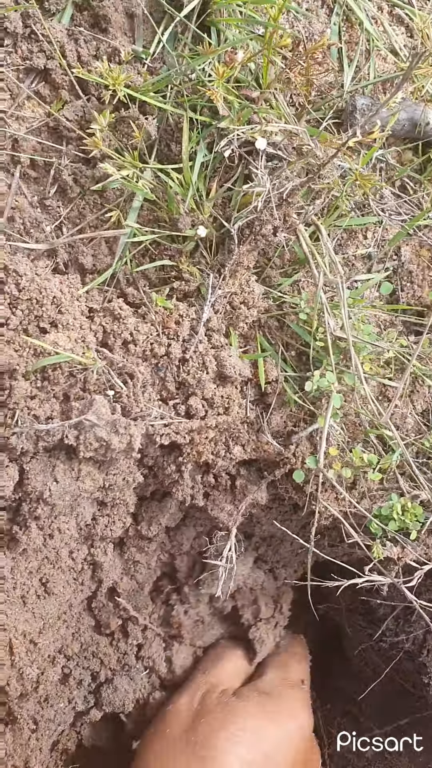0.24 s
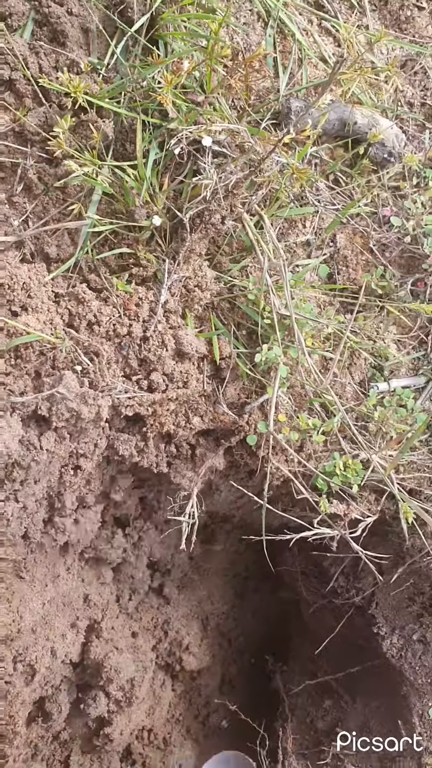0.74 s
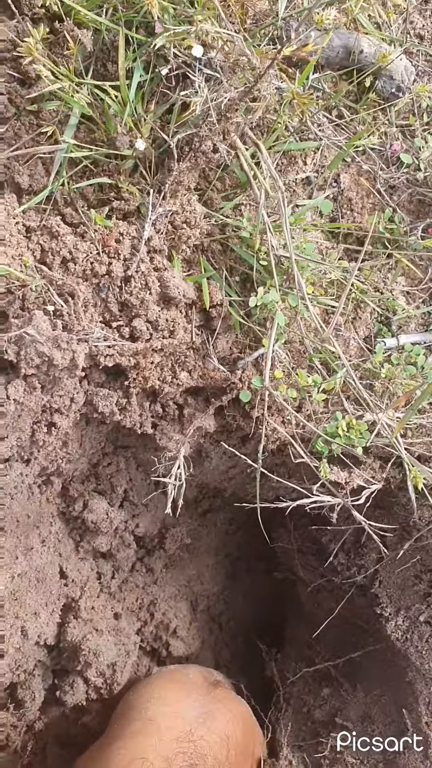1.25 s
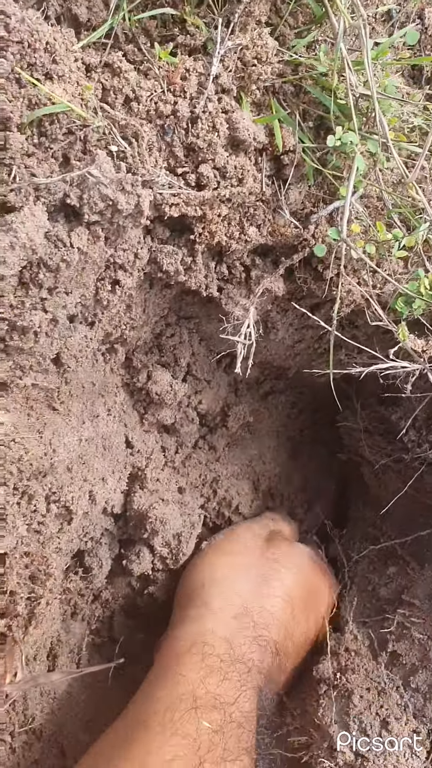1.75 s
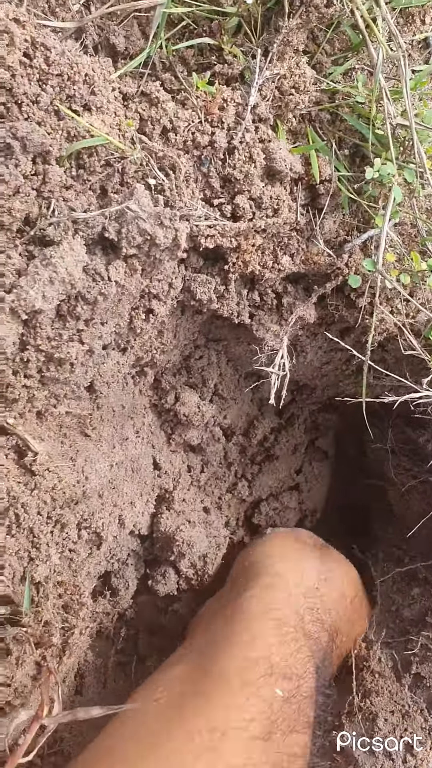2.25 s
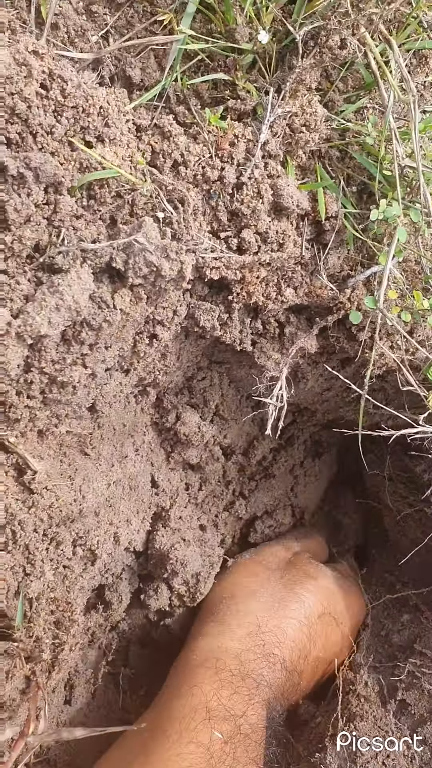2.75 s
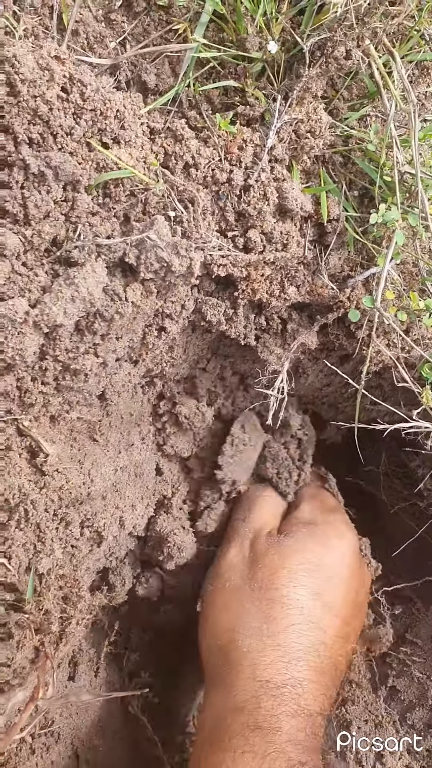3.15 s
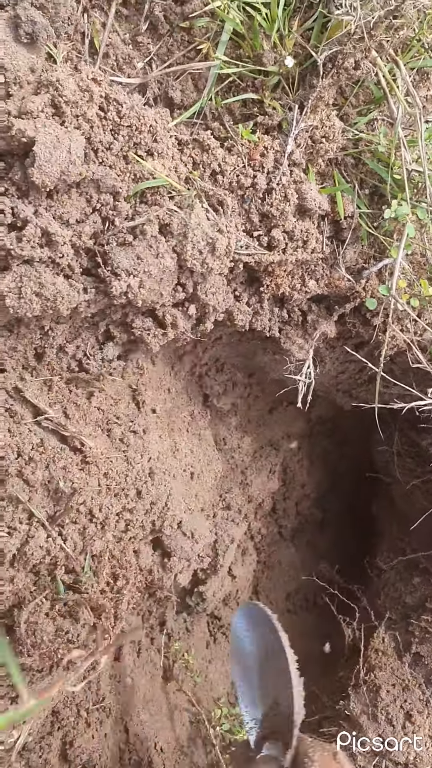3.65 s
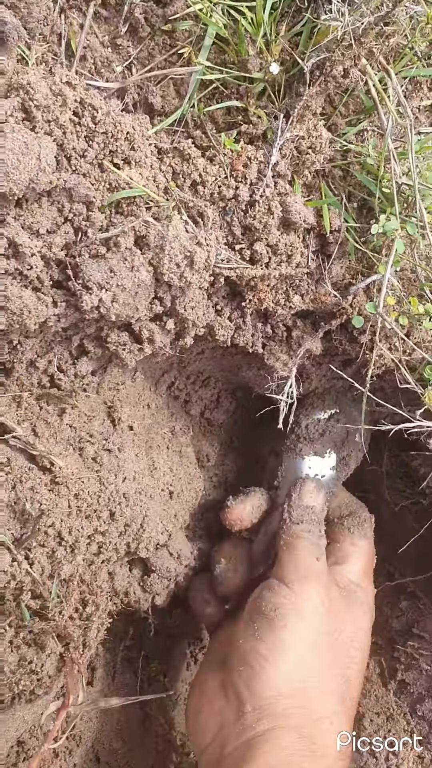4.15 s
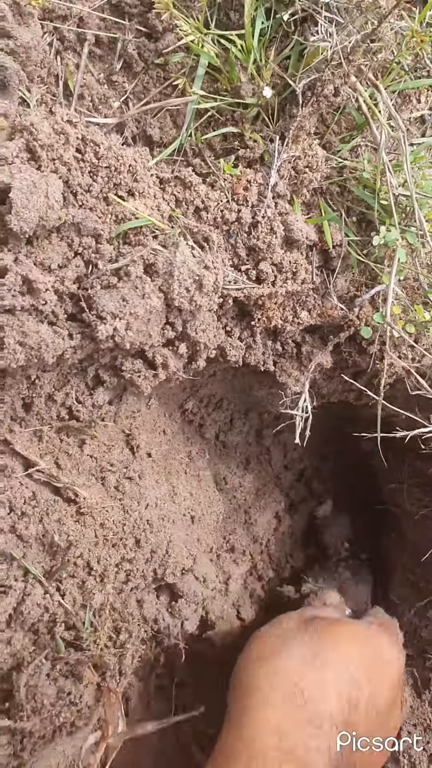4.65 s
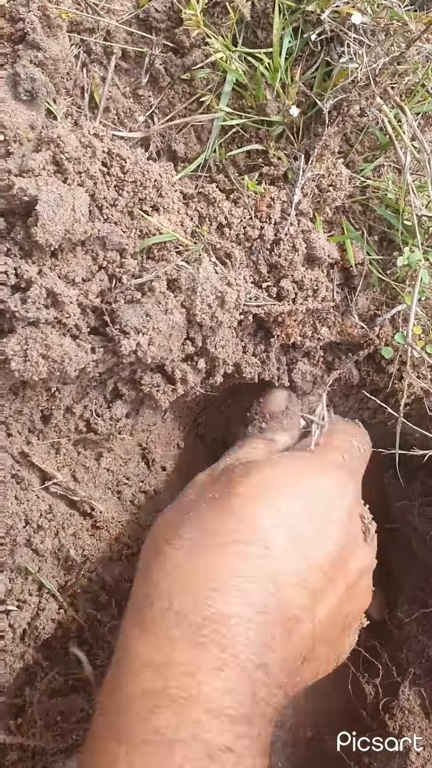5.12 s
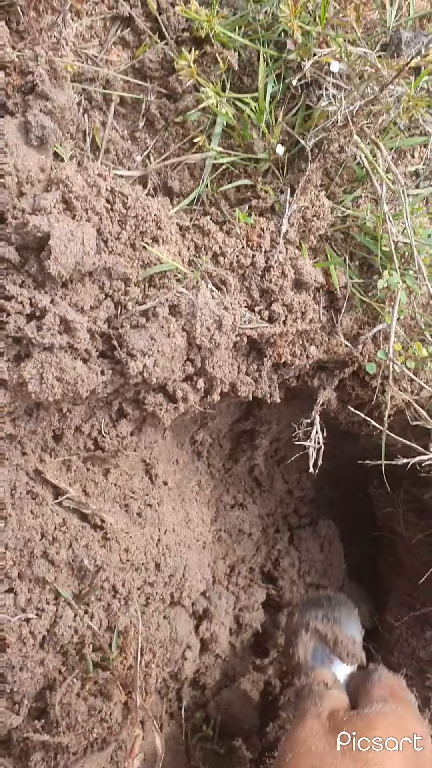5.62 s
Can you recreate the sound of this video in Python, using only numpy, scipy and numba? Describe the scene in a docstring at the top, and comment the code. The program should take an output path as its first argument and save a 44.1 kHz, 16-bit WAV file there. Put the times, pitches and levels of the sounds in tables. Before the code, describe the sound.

Fingers rake loose soil in a small hole, in short gritty strokes with brief pauses. A thin spoon scrape comes after about a second, then a busier run of hand digging. Near the end a spoon digs and scoops with two louder, rasping scrapes. Lumps crack, crumbs trickle and the hand thuds softly on the ground. It is close and outdoors, with soft air rumble on the microphone.

```python
"""Digging loose soil by hand and spoon

Close to a phone outdoors, each stroke in a small hole crushes thousands of grains in small slips,
coloured by the hollow between hand and hole. Lumps crack, crumbs spill in the pauses and the hand
thuds on the ground. Air rumbles softly on the microphones over a faint hiss."""
import sys
import numpy as np
from scipy import signal
from scipy.fft import rfft, irfft, next_fast_len
from scipy.io import wavfile
from scipy.ndimage import uniform_filter1d, map_coordinates
from numba import njit

SR = 44100
rng = np.random.default_rng(int(sys.argv[2]) if len(sys.argv) > 2 else 0)


def transcribe(signal):
    """Save signal, clipped to [-1, 1], as a 16-bit WAV file at the path in sys.argv[1]."""
    frames = np.atleast_2d(signal).T
    limited = np.clip(frames, -1, 1)
    pcm = np.round(limited * 32767).astype(np.int16)
    wavfile.write(sys.argv[1], SR, pcm)


N = 259308
T = np.arange(N) / SR

# finger sweeps: (start [s], press [s], bite [s], drag [s], level [dB], clods [rel. dB], sand [rel. dB])
HAND_STROKES = [(-0.03, 0.1, 0.006, 0.0033, -38, -1.5, 0), (0.102, 0.0093, 0.019, 0.004, -39, -6, -1.5),
                (0.185, 0.056, 0.22, 0.028, -48.5, -10.5, -2), (0.448, 0.039, 0.042, 0.002, -49, -3.5, 0),
                (0.54, 0.028, 0.27, .09, -75, -5, 7), (1.547, 0.07, 0.024, 0.0041, -45, -6, -0.5),
                (1.767, 0.074, 0.011, 0.025, -37.5, -7, -2.5),
                (2.154, 0.13, 0.029, .005, -38.5, -12.5, 4.5),
                (2.256, 0.069, 0.0022, 0.17, -34.5, -9.5, -3), (2.53, 0.045, 0.066, 0.026, -44, -5, -4.5),
                (2.614, 0.012, 0.026, 0.011, -39, -3, -3.5), (2.675, 0.12, 0.11, 0.12, -40.5, -4, -7),
                (2.912, 0.018, 0.045, 0.16, -40, -10.5, -3), (3.12, 0.076, 0.14, 0.081, -40, -13, -2),
                (3.335, 0.033, 0.02, 0.002, -42, -7.5, -18), (4.018, 0.025, 0.036, 0.015, -53, 2, 5.5),
                (5.445, 0.06, 0.014, 0.0011, -43.5, -9.5, 1.5)]
# spoon push, dig and scoop: columns as HAND_STROKES
SPOON_STROKES = [(1.063, 0.16, 0.13, 0.13, -38.5, -14, 1.5), (4.15, .17, 0.17, 0.085, -32, -7.5, -5),
                 (4.972, 0.027, 0.11, 0.22, -31.5, -9, -5.5)]
# hollow around the fingers, then in each spoon stroke: (frequency [Hz], gain [dB])
HAND_TONE = [(280, -8.5), (747, -10.5), (997, -4), (1320, -2.5), (1570, 4.5), (1820, -1), (2100, 2.5),
             (2710, -3.5), (4130, -6.5), (7500, -25.5), (10800, -17.5), (16000, -21.5)]
PUSH_TONE = [(290, -23), (1280, -21), (2400, -13), (3900, -17.5), (5000, -16), (6000, -20.5), (8700, -21.5),
             (11800, -4.5), (16000, -19)]
DIG_TONE = [(280, 5), (760, -4.5), (1020, -3), (1330, -7.5), (1800, 2), (2250, -4.5), (2600, -1),
            (3050, -7), (3800, -3.5), (4650, -7.5), (7600, -19), (10100, -12.5), (16000, -19.5)]
SCOOP_TONE = [(280, 0.5), (465, -7.5), (1100, -12), (1550, -4.5), (2450, -5.5), (3360, -4.5), (3950, -7.5),
              (4500, -14.5), (5600, -14.5), (6300, -23), (8270, -27.5), (11600, -22.5), (16000, -27.5)]
# ringing edge gap: (start [s], end [s], level [dB], start pitch [Hz], end pitch [Hz], width [Hz])
RASPS = [(0.058, 0.082, -39.5, 5000, 4200, 2600), (0.71, 0.762, -60, 3460, 3580, 700),
         (1.071, 1.144, -45.5, 5340, 5100, 1300), (1.077, 1.192, -45, 2930, 2680, 900),
         (1.18, 1.394, -37, 2300, 2420, 786), (1.846, 1.88, -29, 1030, 1220, 696),
         (1.855, 1.876, -24, 1920, 2030, 1170), (2.274, 2.466, -32.5, 2340, 2280, 565),
         (2.55, 2.673, -47, 2090, 2040, 260), (2.29, 2.46, -42.5, 4550, 4930, 1200),
         (3.182, 3.297, -41.5, 400, 358, 272), (3.374, 3.439, -40, 1760, 2070, 1010),
         (4.439, 4.519, -33, 2200, 1840, 650), (4.535, 4.581, -32.5, 1970, 2400, 900),
         (5.044, 5.117, -30.5, 3500, 3100, 1480), (5.004, 5.302, -42, 3800, 3350, 1100),
         (5.501, 5.515, -32, 1770, 1750, 556)]
# lumps cracking: (time [s], level [dB], pitch [Hz], t60 [s])
CRACKS = [(0.014, -24.5, 580, 0.016), (0.0652, -17.5, 520, 0.032), (0.116, -33.5, 700, 0.065),
          (1.4499, -29, 1656, 0.11), (1.881, -12, 1790, 0.012), (2.642, -26, 1020, 0.13),
          (3.4319, -30.5, 1630, 0.0078), (4.294, -37, 2000, 0.0071), (4.5729, -14.5, 2000, 0.0074),
          (4.574, -15.5, 2500, 0.007), (4.604, -18.5, 1170, 0.028), (4.7, -36.5, 580, 0.056)]
# crumb spills: (time [s], level [dB], length [s])
SPILLS = [(0.715, -47.5, 0.062), (0.894, -52.5, 0.085), (1.698, -49, 0.38), (2.045, -37, 0.028),
          (2.101, -47, 0.045), (3.531, -43.5, 0.013), (3.643, -53, 0.028), (3.698, -47.5, 0.014),
          (3.54, -60.5, 1), (3.884, -56, 0.032), (4.954, -50, 0.043), (5.547, -39, 0.022),
          (5.62, -51, 0.095)]
# crumb spectrum: (frequency [Hz], gain [dB])
SPILL_TONE = [(760, -1), (1300, -5), (3790, 1.5), (9270, -0.5), (12300, 6.5), (16000, 2.5)]
# hand bumping the ground: (time [s], peak [dB], pitch [Hz])
THUDS = [(0.613, -31.5, 61.5), (0.755, -34, 128), (0.888, -28.5, 75.5), (1.689, -29.5, 76.5),
         (2.815, -25, 85), (2.875, -26, 86), (3.046, -34, 67.5), (4.035, -28, 92), (4.283, -24.5, 86)]
# air on the microphones: (time [s], level [dB])
RUMBLE_LEVEL = [(0, -39), (0.55, -46), (0.88, -40), (1.0, -47), (1.12, -43.5), (3.4, -45), (3.97, -46),
                (4.3, -43), (4.72, -46.5), (5.1, -41.5), (5.88, -43)]
# its spectrum: (frequency [Hz], gain [dB])
RUMBLE_TONE = [(15, -11), (30, -16.5), (50, -0.5), (85, -0.5), (130, -8), (220, -10), (400, -28.5),
               (800, -45.5)]
# outdoor hiss: (time [s], level [dB])
HISS_LEVEL = [(4.0, -61), (4.8, -64), (5.88, -60.5)]
# its spectrum: (frequency [Hz], gain [dB])
HISS_TONE = [(500, 2), (1000, -12), (2000, -1), (3100, -6), (4500, 1), (7600, -16), (11000, 3.5),
             (16000, -11)]
# soil at the two microphones: (frequency [Hz], side gain [dB], left minus right [dB])
MIC_RESPONSE = [(400, -11, 0), (1100, -5, 3.2), (2500, -4.5, 2.8), (5500, -2, .8), (12000, 0, -.4)]
# moving scrape point; the spoon's edge is one small source, spread fingers are many:
# (time [s], left lag [ms], side gain [dB])
SCRAPE_PATH = [(0.95, 0, 0), (1.07, 0.12, -8), (1.27, 0.12, -15), (1.42, 0.165, -11), (1.55, 0.03, -1),
               (2.12, 0.03, -4), (2.28, 0.18, -6), (2.45, 0.18, -7), (2.55, 0, 0), (4.2, 0.018, -1.5),
               (5.0, -0.012, -2.5)]


def digging():
    """Crumbly finger sweeps and three spoon scrapes; coarse grit ticks on the spoon."""
    hand = crunch(per_s=8000, spread_db=2.6, slip_db=1.5, clod_db=1.2, patchy_db=2.7)
    spoon = crunch(per_s=7500, spread_db=2.0, slip_db=1.6, clod_db=1.1, patchy_db=2.4)
    spoon += undb(-12) * grains(per_s=70, spread_db=1)
    edge = crunch(per_s=12000, spread_db=0.5, slip_db=1.6, clod_db=0.5, patchy_db=1.5)
    out = scrape(hand, HAND_TONE, HAND_STROKES) + rasps(edge)
    for stroke, tone in zip(SPOON_STROKES, (PUSH_TONE, DIG_TONE, SCOOP_TONE)):
        out += scrape(spoon, tone, [stroke])
    return out


def crunch(per_s, spread_db, slip_db, clod_db, patchy_db):
    """Grains break in quick slips and slower clod-sized ones; each soil patch favours its own pitches."""
    clicks = grains(per_s, spread_db) * undb(slip_db * stress(per_s=230) + clod_db * stress(per_s=45))
    spectra = signal.stft(clicks, nperseg=512)[2]
    patches = rng.standard_normal(spectra.shape[1:])
    for _ in range(2):
        patches = uniform_filter1d(patches, size=4, axis=0)
        patches = uniform_filter1d(patches, size=7, axis=1)
    spectra *= undb(patchy_db * unit(patches))
    return unit(signal.istft(spectra)[1][:, :N])


def grains(per_s, spread_db):
    """Random clicks, a few of them large; mid and side rows differ only in their signs."""
    size = undb(spread_db * np.minimum(rng.exponential(size=N), 5))
    hits = rng.random(N) < per_s / SR
    return unit(hits * size * rng.choice([-1, 1], (2, N)))


def stress(per_s):
    """Stress builds and lets go at random moments; rms near 1."""
    breaks = np.flatnonzero(rng.random(N) < per_s / SR)
    ramp = np.interp(np.arange(N), breaks, np.arange(len(breaks))) % 1
    return np.sqrt(12) * (ramp - .5)


def scrape(grit, tone, strokes, sand_fade_db_per_s=6):
    """Soil heard through the hollow: clods give the body, sand the top. Dry sand thins with depth."""
    power = np.zeros((3, N))
    for start_s, press_s, bite_s, drag_s, db, clod_db, sand_db in strokes:
        force = undb(db) * pressure(start_s, press_s, bite_s, drag_s)
        sand = undb(sand_db - sand_fade_db_per_s * np.maximum(T - start_s, 0))
        power += np.array([force * undb(clod_db), force, force * sand]) ** 2
    coloured = colour(grit, tone)
    bands_hz = (280, 900), (900, 6000), (6000, 16000)
    return sum(unit(band(coloured, *hz)) * gain for hz, gain in zip(bands_hz, np.sqrt(power)))


def pressure(start_s, press_s, bite_s, drag_s):
    """Stroke force, 0-1: touch, press in, bite until the soil gives way, drag, lift off."""
    touch_db, touch_s = -12, 0.03
    give_db, give_tau_s, lift_tau_s = -6, 0.0044, 0.048
    age_s = np.maximum(T - start_s, 0)
    loose_s = np.maximum(age_s - press_s - bite_s, 0)
    press = np.minimum(age_s / touch_s, 1) * undb(touch_db * np.maximum(1 - age_s / press_s, 0))
    give = undb(give_db * (1 - np.exp(-loose_s / give_tau_s)))
    lift = np.exp(-np.maximum(loose_s - drag_s, 0) / lift_tau_s)
    return press * give * lift


def rasps(grit):
    """Grains ring the gap at the scraping edge; the pitch glides as it opens or closes."""
    out = np.zeros((2, N))
    for start_s, end_s, db, start_hz, end_hz, width_hz in RASPS:
        hz = np.interp(T, (start_s, end_s), (start_hz, end_hz))
        ring = np.array([resonate(resonate(row, hz, width_hz), hz, width_hz) for row in grit])
        fade_s = (end_s - start_s) / 4
        gate = np.clip(np.minimum(T - start_s, end_s - T) / fade_s + .5, 0, 1)
        out += unit(ring) * undb(db) * gate
    return out


def cracks(snap_db=-17, crumble_db=-6.5, build_s=0.00134, decay_cycles=1.6):
    """A lump strains, then gives way: a dead pitched knock, a crumbling burst and a bright snap."""
    out = np.zeros((2, N))
    for time_s, db, hz, t60_s in CRACKS:
        near = np.abs(T - time_s) < .1
        age_s = T[near] - time_s - build_s
        burst = rng.standard_normal((2, len(age_s)))
        crack = undb(crumble_db) * unit(band(burst, hz / 2, hz * 1.53, order=2))
        crack += undb(snap_db) * unit(band(burst, 1600, 12000, order=1))
        cycles = hz * np.maximum(age_s, 0)
        crack[0] += np.sin(2 * np.pi * cycles) * np.exp(-cycles / decay_cycles)  # knock, mid only
        envelope = np.exp(np.minimum(age_s / build_s, -np.log(1000) * age_s / t60_s))
        out[:, near] += undb(db) * crack * envelope
    return out


def spills():
    """Crumbs run down the wall in small rushes that swell and settle."""
    flow = np.zeros(N)
    for time_s, db, length_s in SPILLS:
        flow += undb(db) * swell(time_s, rise_s=length_s / 4)
    return unit(colour(grains(per_s=5000, spread_db=2.5), SPILL_TONE)) * flow


def thuds():
    """Soft flesh on packed earth: a few slow swings."""
    out = np.zeros(N)
    for time_s, db, hz in THUDS:
        out += undb(db) * np.sin(2 * np.pi * hz * (T - time_s)) * swell(time_s, rise_s=0.0066)
    return out


def rumble(side_db=-6, flutter_db=2.5, upper_drift_db=1.0):
    """Air flutters on the microphone ports; the upper part swells and fades on its own."""
    flow = unit(colour(rng.standard_normal((2, N)), RUMBLE_TONE))
    upper = signal.sosfiltfilt(signal.butter(2, 190, "high", fs=SR, output="sos"), flow)
    mid, side = flow + upper * (undb(upper_drift_db * drift(per_s=10)) - 1)
    gust = undb(np.interp(T, *np.transpose(RUMBLE_LEVEL)) + flutter_db * drift(per_s=14))
    return gust * (mid + undb(side_db) * side * np.array([[1], [-1]]))


def hiss():
    """Faint outdoor hiss; dips briefly near the end."""
    gain = undb(np.interp(T, *np.transpose(HISS_LEVEL)))
    return unit(colour(rng.standard_normal((2, N)), HISS_TONE)) * gain


def microphones(soil):
    """Mid/side to left/right: wider in the treble; the left lags as the scrape moves right."""
    hz, side_db, pan_db = np.transpose(MIC_RESPONSE)
    times_s, lag_ms, path_side_db = np.transpose(SCRAPE_PATH)
    mid, side = soil
    side = colour(side, zip(hz, side_db)) * undb(np.interp(T, times_s, path_side_db))
    lag_s = np.interp(T, times_s, lag_ms) / 1000
    left = map_coordinates(mid + side, [(T - lag_s) * SR], order=5, mode="mirror")
    return np.array([colour(left, zip(hz, pan_db / 2)), colour(mid - side, zip(hz, -pan_db / 2))])


def undb(db):
    """Decibels to gain."""
    return 10 ** (np.asarray(db) / 20)


def unit(x):
    """Scale to rms 1."""
    return x / np.sqrt(np.mean(x ** 2))


def swell(start_s, rise_s):
    """Envelope that rises to 1, then decays."""
    rises = np.maximum(T - start_s, 0) / rise_s
    return rises * np.exp(1 - rises)


def drift(per_s):
    """Ramps between random values; rms 1."""
    hold = int(SR / per_s)
    steps = np.repeat(rng.standard_normal(N // hold + 1), hold)
    return unit(uniform_filter1d(steps, hold)[:N])


def colour(x, points):
    """Minimum-phase filter through (frequency [Hz], gain [dB]) points."""
    hz, db = np.transpose(sorted(points))
    size = 2 * next_fast_len(N // 2 + 4096)
    bins_hz = np.maximum(np.fft.rfftfreq(size, 1 / SR), 1)
    gain = undb(np.interp(np.log(bins_hz), np.log(hz), db))
    cepstrum = irfft(np.log(gain))
    cepstrum[1:size // 2] *= 2
    cepstrum[size // 2 + 1:] = 0
    return irfft(rfft(x, size) * np.exp(rfft(cepstrum)))[..., :N]


def band(x, lo_hz, hi_hz, order=4):
    """Butterworth band-pass."""
    return signal.sosfilt(signal.butter(order, [lo_hz, hi_hz], "band", fs=SR, output="sos"), x)


@njit
def resonate(x, hz, width_hz):
    """State-variable band-pass with a moving centre."""
    out = np.empty(len(x))
    band_state, low_state = 0., 0.
    for i in range(len(x)):
        g, damping = np.tan(np.pi * hz[i] / SR), width_hz / hz[i]
        passed = (band_state + g * (x[i] - low_state)) / (1 + g * (g + damping))
        band_state = 2 * passed - band_state
        low_state += 2 * g * passed
        out[i] = damping * passed
    return out


def scene():
    """Everything at the hole; open ground gives no echo."""
    soil = digging() + cracks() + spills()
    bass = thuds() + rumble()
    return microphones(soil) + bass + hiss()


def record(dry):
    """The phone cuts the top."""
    cutoff_hz = 15900
    return signal.sosfilt(signal.ellip(10, .2, 70, cutoff_hz, fs=SR, output="sos"), dry)


dry = scene()
out = record(dry)
transcribe(out)
```